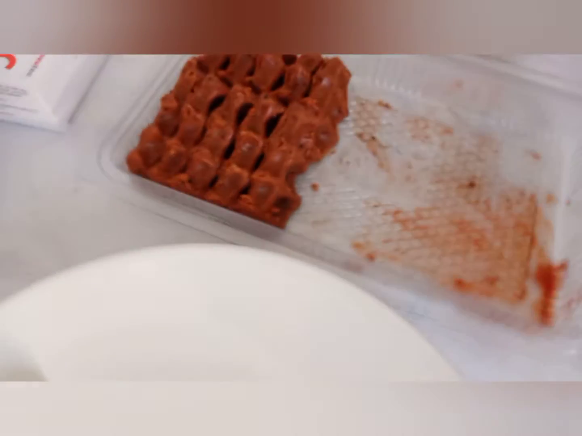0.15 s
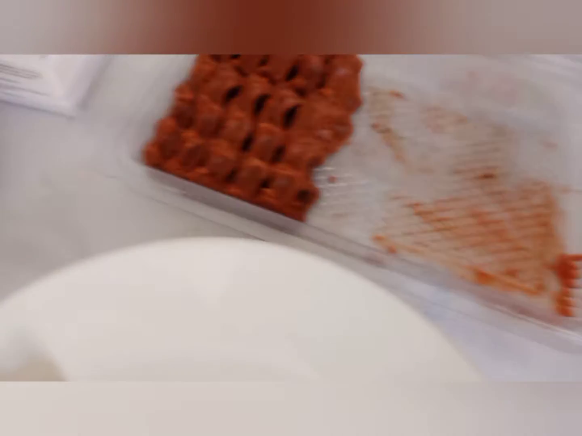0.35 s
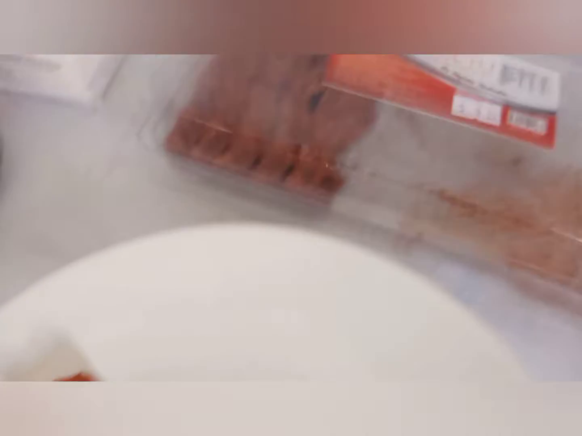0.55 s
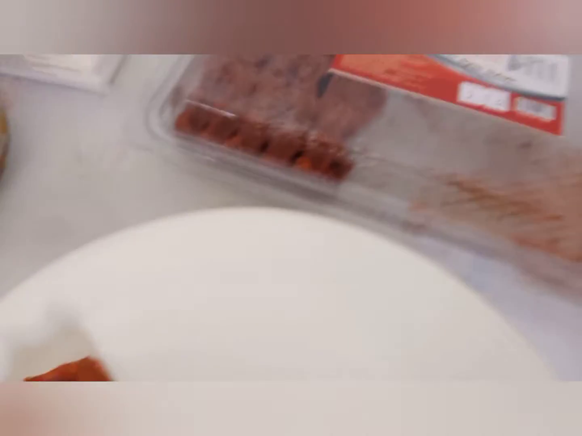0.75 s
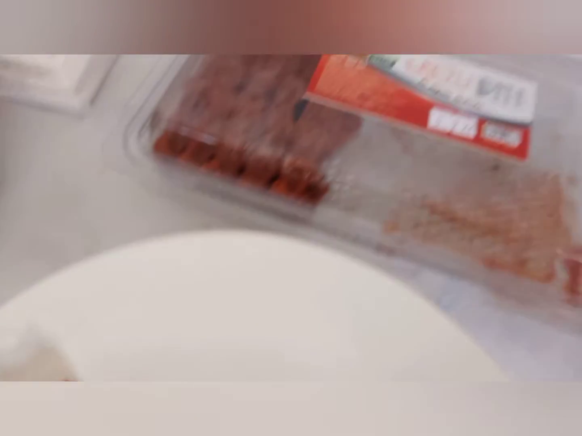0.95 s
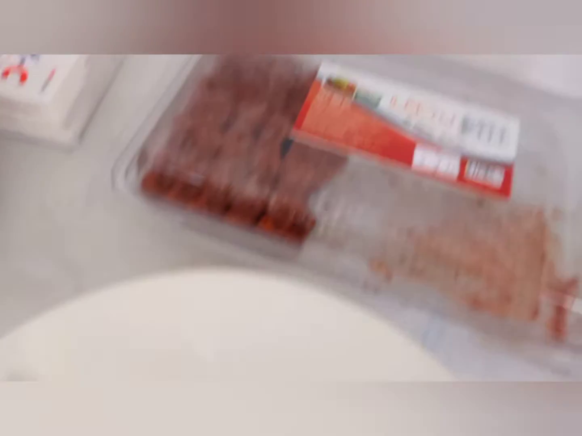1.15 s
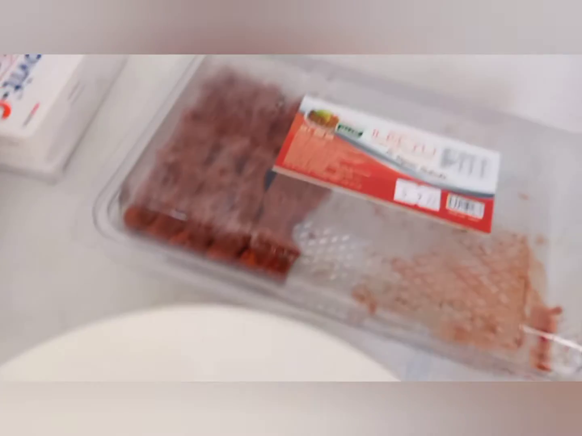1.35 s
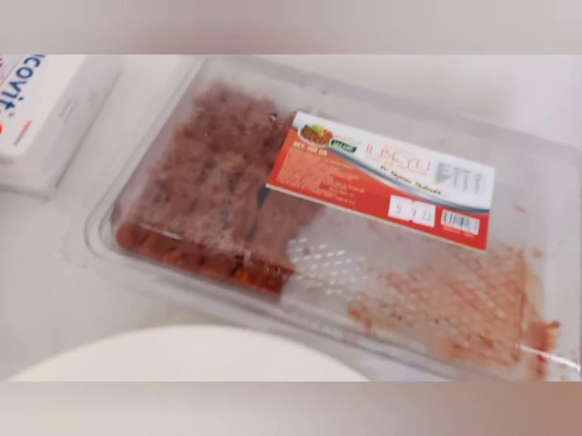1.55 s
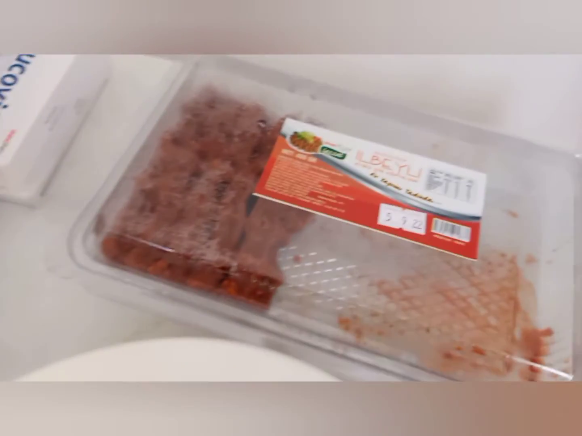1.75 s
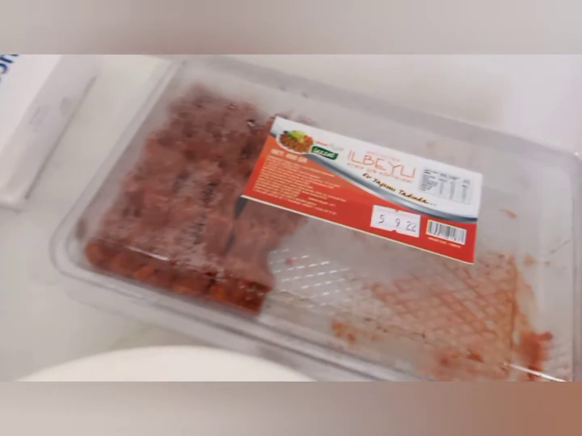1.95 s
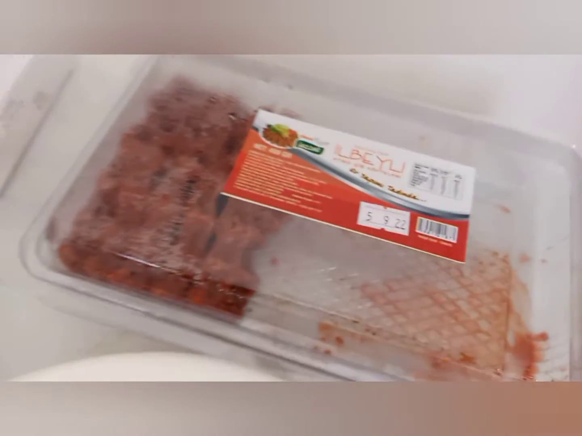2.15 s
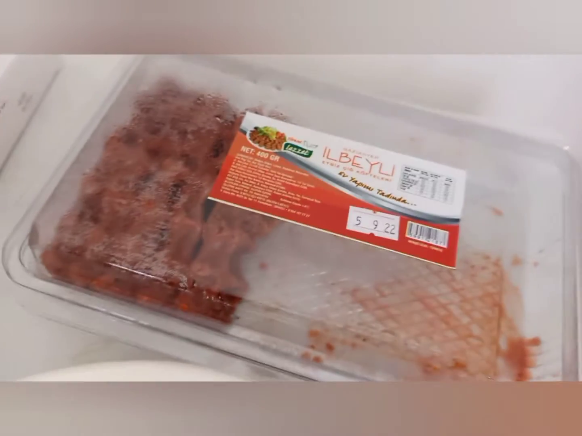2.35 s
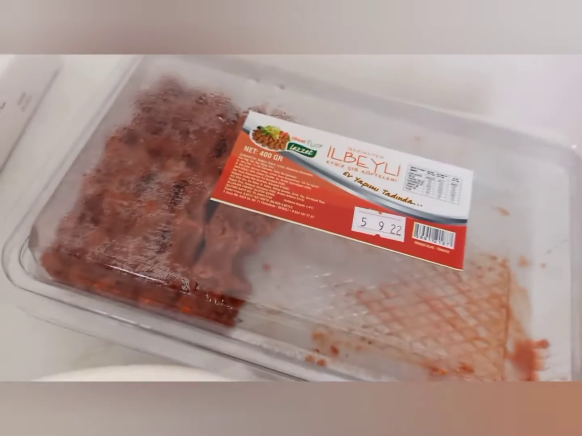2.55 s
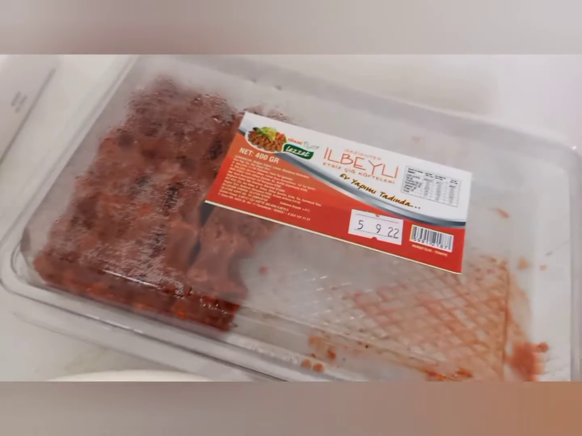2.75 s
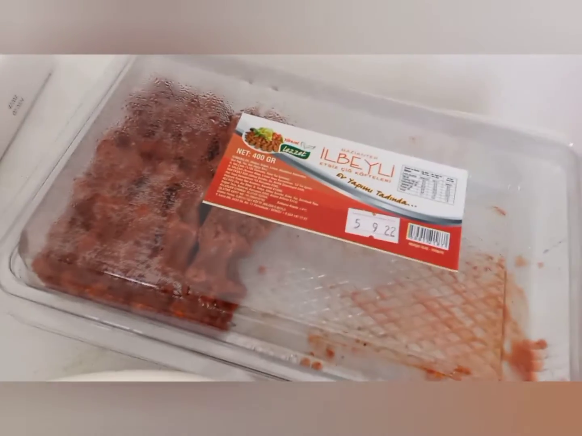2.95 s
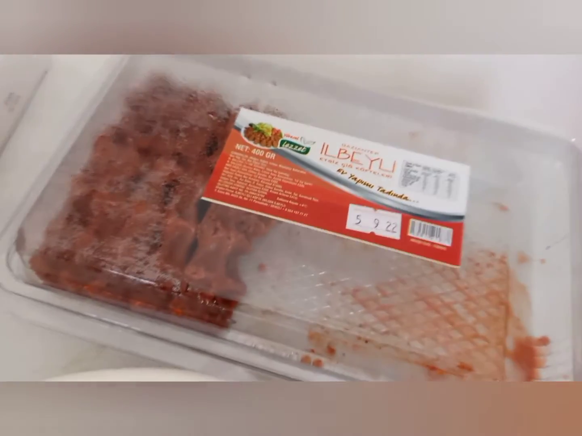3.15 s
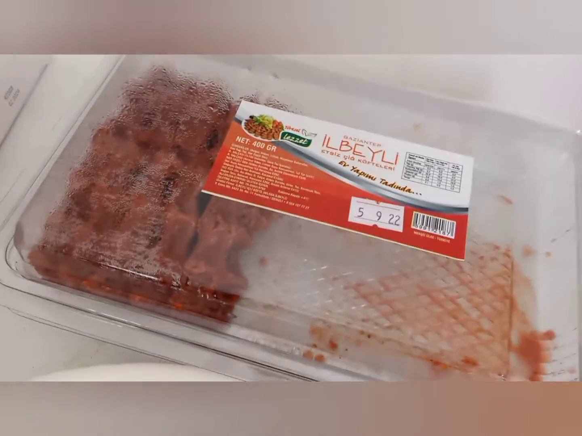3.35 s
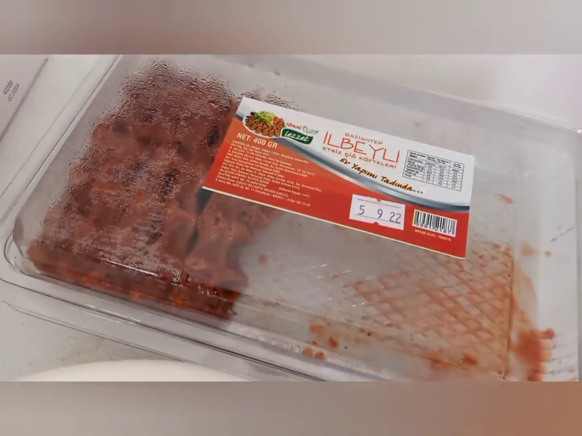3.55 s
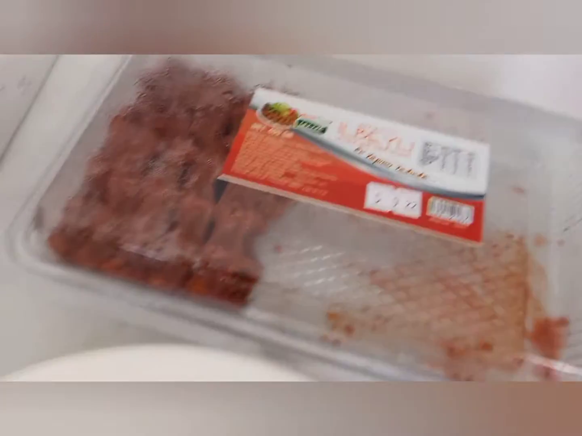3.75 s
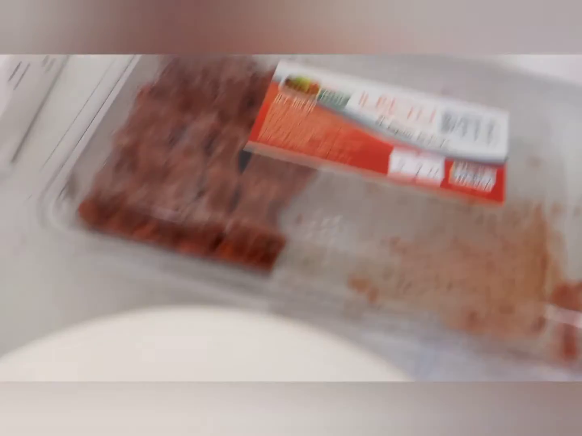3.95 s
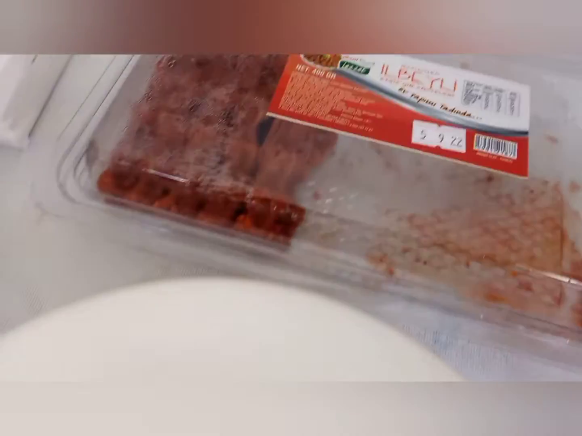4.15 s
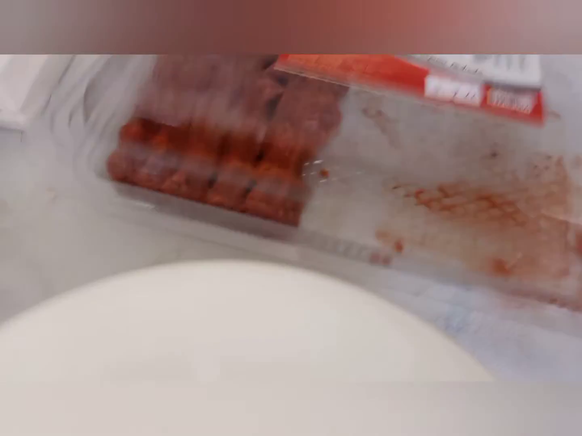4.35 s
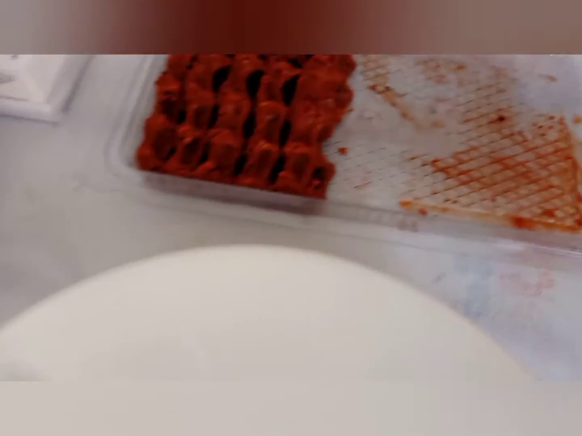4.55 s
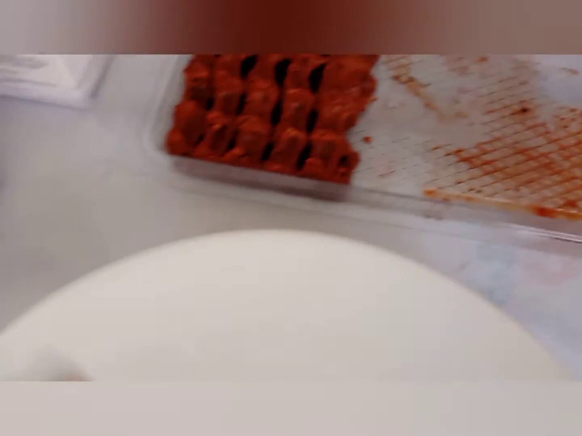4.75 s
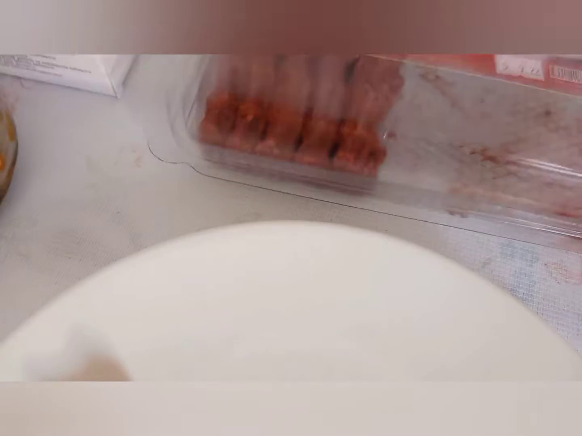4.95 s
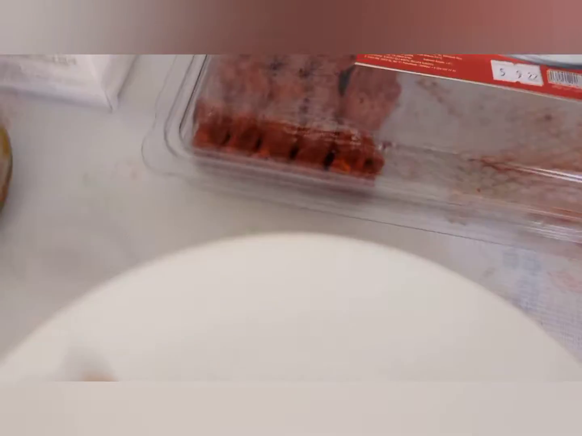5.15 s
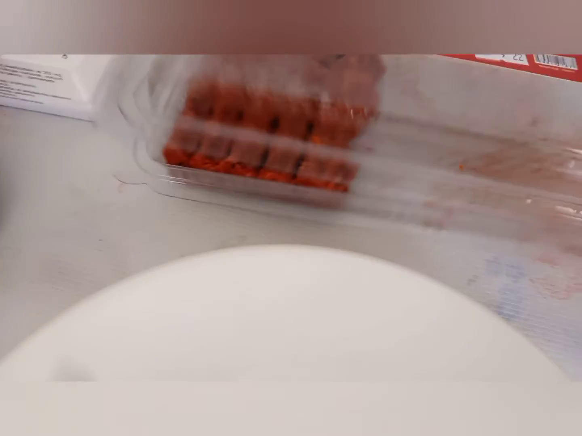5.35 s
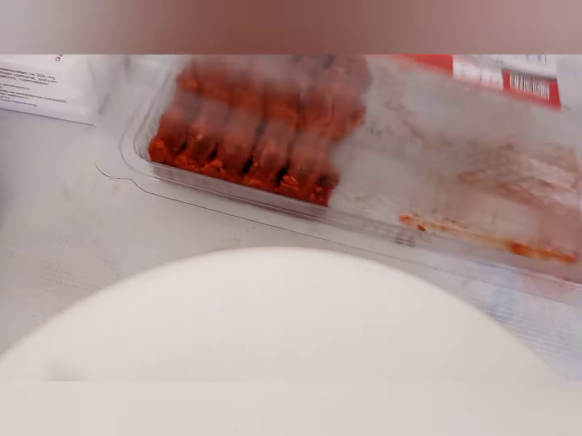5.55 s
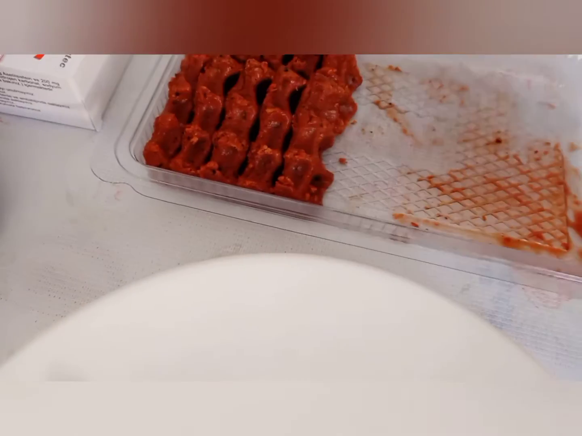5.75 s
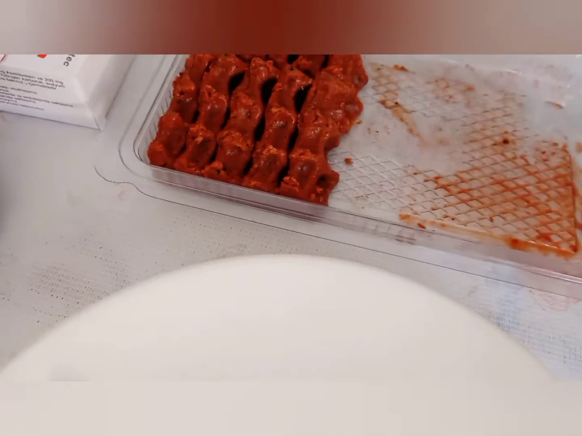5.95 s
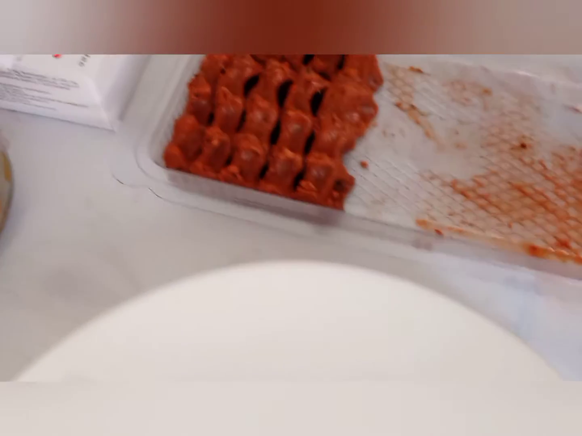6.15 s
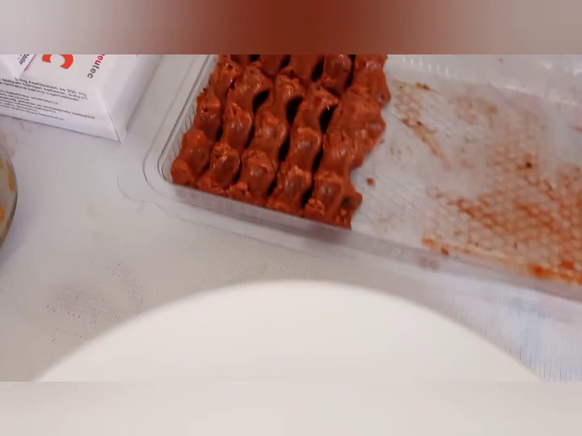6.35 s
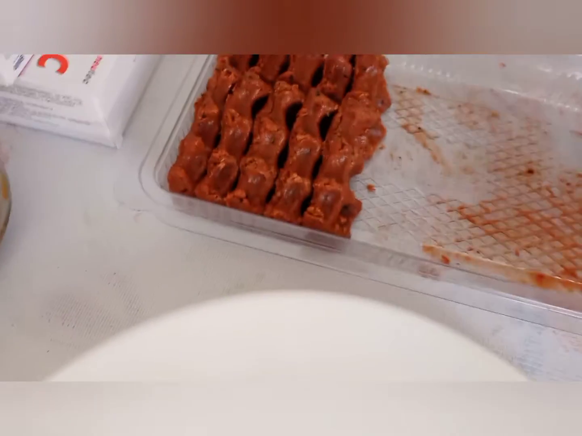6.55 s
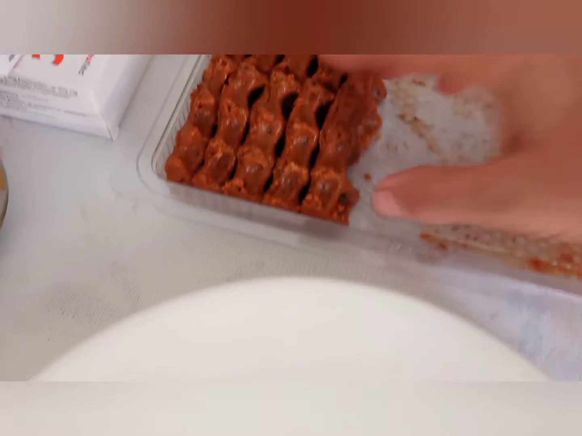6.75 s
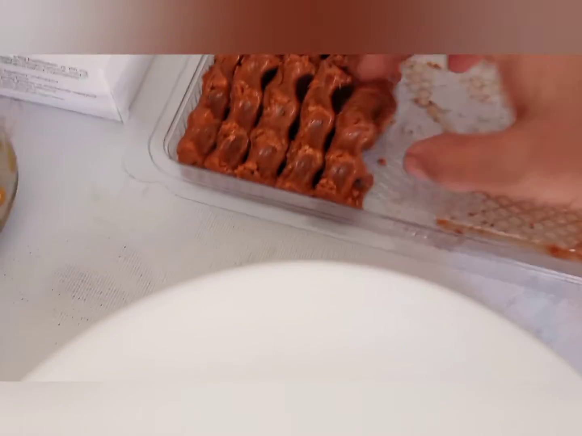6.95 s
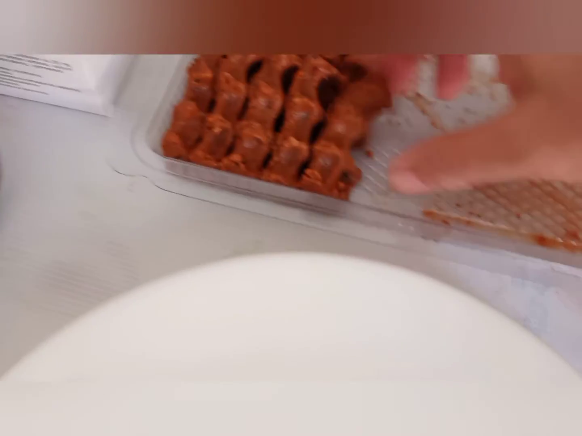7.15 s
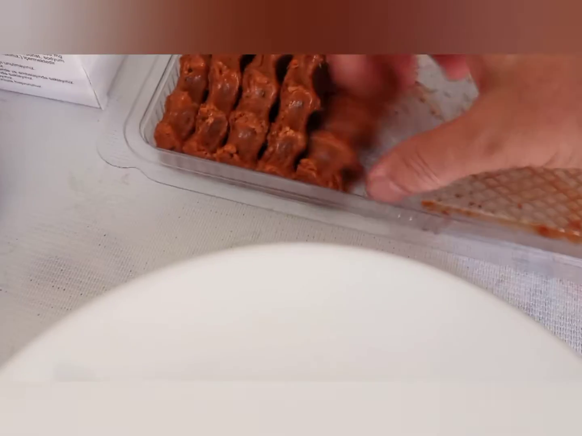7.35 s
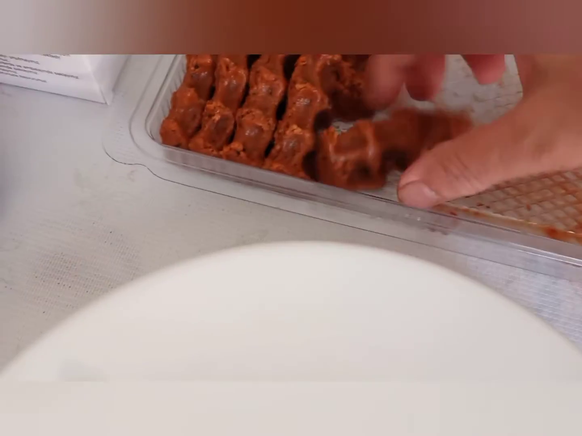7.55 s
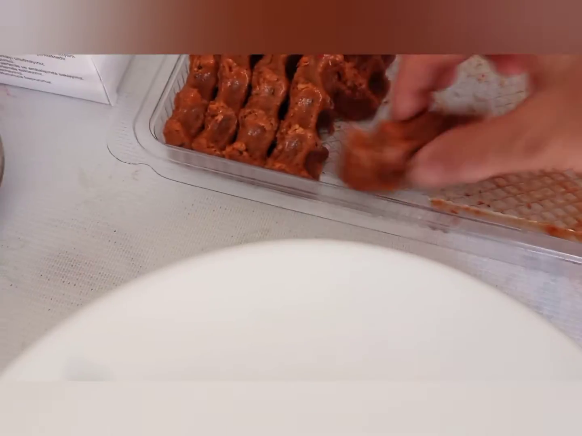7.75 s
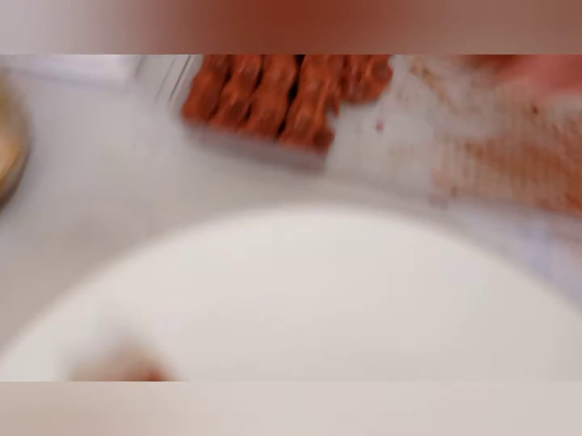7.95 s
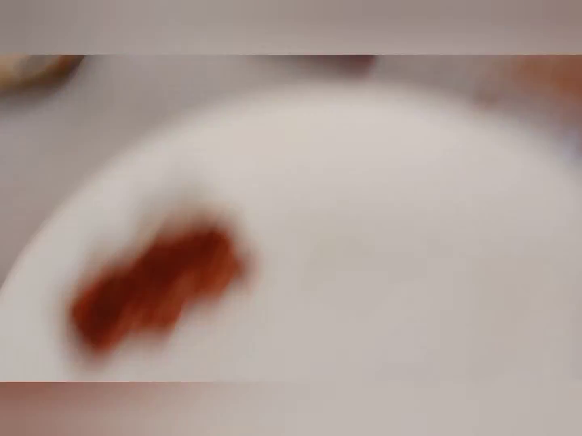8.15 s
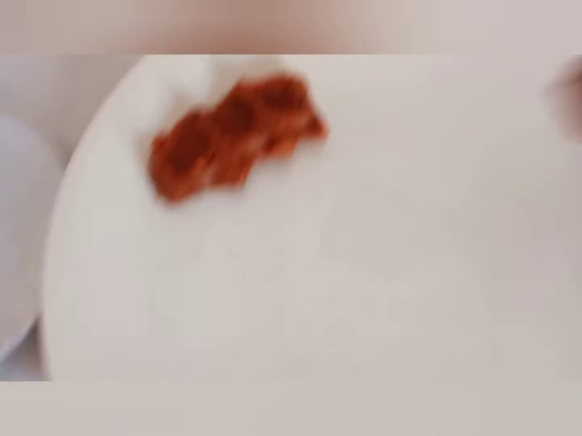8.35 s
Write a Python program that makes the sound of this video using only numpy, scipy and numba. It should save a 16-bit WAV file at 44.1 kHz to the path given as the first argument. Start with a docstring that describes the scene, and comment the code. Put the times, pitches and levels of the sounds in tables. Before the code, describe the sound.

Sharp clicks, short rubs and low flaps come from a plastic food box closed and opened by hand in a quiet room.

```python
"""A thin plastic food tray, its lid shut, opened and flexed by hand on a table, close to a phone microphone.
Creases snap and ring the tray, the rim rubs and rattles, the loose lid wobbles in the bass, food peels off.
The place is a small room that answers briefly. Far outside, a sparrow gives short falling chirps.
Behind it all lie faint whistles, a low household drone and soft air hiss."""
import sys
import numpy as np
from scipy import signal
from scipy.fft import rfft, irfft, next_fast_len
from scipy.io import wavfile
from scipy.ndimage import uniform_filter1d
from numba import njit

SR = 44100
rng = np.random.default_rng(int(sys.argv[2]) if len(sys.argv) > 2 else 0)


def digitize_waveform(pressure):
    """Quantize a signal to 16-bit integers and store it at the path in sys.argv[1].

    Rows of a 2-D input are taken as channels; values are limited to [-1, 1].
    """
    field = np.atleast_2d(pressure).T
    bounded = np.clip(field, -1, 1)
    quanta = np.round(bounded * 32767).astype(np.int16)
    wavfile.write(sys.argv[1], SR, quanta)


N = 370440

SNAP_T60_S, HOLLOW_T60_S, HOLLOW_DB = 0.033, 0.14, -15  # the tray's hollow rings on after a snap
SOFT_DB, HARD_DB = -59, -24  # a snap has no hard tick at the first level, all of it at the second
# creases, close up: t/s, crack peak/dB, crack f/Hz, treble/dB, body/dB (both against the crack)
CREASE_SNAPS = [(0.2866, -24.5, 4700, -2, -46), (0.496, -12.5, 4660, -13, -13.5),
                (0.6499, -28, 1920, -8, -3), (0.6805, -22.5, 2850, -21, -12), (0.7026, -15, 6640, -8, -21),
                (0.7103, -14, 7300, -5, -12), (0.7644, -23.5, 1980, -30, -4),
                (1.886, -37.5, 1810, -30, -36), (2.2086, -38.5, 1820, -3, -36), (4.005, -36, 1760, -5, -26),
                (4.0233, -21.5, 3670, -10, 2), (4.318, -21.5, 1640, -17, -10.5),
                (4.4021, -21.5, 1530, -37, -6), (4.4285, -25, 1620, -4.5, -3.5),
                (4.6578, -36.5, 5700, -19, 0), (4.6877, -27.5, 2100, -5.5, -2),
                (5.0884, -16, 6450, -6.5, -12), (5.1024, -36, 4260, -16, -21),
                (5.1145, -26, 3660, -15.5, -12), (5.13, -21, 6850, -5, -11), (5.16, -32.5, 6850, -6, -8),
                (5.283, -35.5, 6260, 2.5, -33), (5.336, -40, 5000, -11, -12.5),
                (5.5178, -20, 1560, -3.5, -14.5), (5.5496, -19, 1480, -2, -1),
                (5.5814, -22.5, 2060, -3, -4), (5.844, -24, 4970, -9, -34.5), (6.1535, -18, 1550, -10, -9),
                (6.1744, -19.5, 5250, -15, -13.5), (6.2353, -18.5, 1560, -8.5, -3.5),
                (6.2472, -11.5, 3400, -20, -6.5), (6.2911, -29, 3500, -21, 5.5),
                (6.3144, -29.5, 3260, -16, 4.5), (6.354, -37, 1680, -20, 9), (6.4196, -22, 3570, -27, -13),
                (6.4683, -28, 1750, -21, -11), (6.534, -40, 1560, -37, -31), (6.5682, -42, 1770, -35, 5),
                (7.1838, -35, 1630, -41, -17), (7.7288, -40, 1700, -36, -6)]
def snaps():
    """A crease flips: one hard tick, then a dying burst of slips; the treble dies first, the hollow last."""
    out, t = np.zeros(N), np.arange(SR // 5) / SR
    fade = decay(t, SNAP_T60_S)
    slipping = fade * (1 - np.exp(-t / 0.001884))
    hollow = undb(HOLLOW_DB) * decay(t, HOLLOW_T60_S)
    for s, db, hz, treble_db, body_db in CREASE_SNAPS:
        noise = rng.standard_normal(len(t))
        hardness = np.clip((db - SOFT_DB) / (HARD_DB - SOFT_DB), 0, 1)
        tick = 1.33 * hardness * np.exp(-t / 0.00075)
        crack, treble, body = tray(noise * (slipping + tick), hz, spread=0.35, lasting=noise * hollow)
        treble = peak(treble * fade ** 0.5, db + treble_db)
        add(out, s, peak(crack, db) + treble + peak(body, db + body_db))
    return out


CRACK_BAND = signal.butter(5, [1100, 7600], "band", fs=SR, output="sos")
BODY_BAND = signal.butter(3, [280, 1000], "band", fs=SR, output="sos")
# modes of the whole tray: f/Hz, width/Hz, gain/dB
BODY_MODES = [(305.2, 67, -5.5), (373.2, 15.5, 0.5), (491.4, 18, 4), (541, 20.2, 2), (603.4, 22, 4),
              (709, 93, 2), (832.4, 40, -10), (1068, 60, -12)]
# modes of the thin sheet: f/Hz, width/Hz, gain/dB
SHEET_MODES = [(1483, 455, 3.5), (1736, 56, 5), (2292, 57, -2), (2909, 43, 0), (3300, 120, -8.5),
               (3880, 1400, -3), (4446, 100, -6), (4990, 280, -14), (5810, 110, -9), (6310, 420, -3),
               (6800, 19, -13), (7195, 250, -1.5)]
# colour of the plastic above the crack band: f/Hz, gain/dB
TREBLE_COLOUR = [(7000, -5.5), (8500, 4.5), (11000, 3), (13000, -8), (15000, 4.5), (16000, -2)]
def tray(drive, hz, spread, lasting=0):
    """The plastic answers a drive with crack, treble and body; lasting stirs only the body."""
    share = rng.standard_normal(len(BODY_MODES) + len(SHEET_MODES))
    body_share, sheet_share = np.split(share, [len(BODY_MODES)])
    width = 1.1 * spread * hz
    pitched = svf(svf(drive, 1. * hz, width), 1. * hz, width)
    wide = svf(svf(drive, 1.4 * hz, 4.3 * hz), 1.6 * hz, 5.6 * hz)
    # bending the sheet detunes its modes; those near the pitch of the crack answer most
    bent = np.array(SHEET_MODES) * [1 + 0.019 * share[-1], 1, 1]
    near = undb(-8 * np.abs(np.log2(bent[:, 0] / hz)))
    sheet = ring(drive, bent, near * np.tanh(sheet_share))
    crack = signal.sosfilt(CRACK_BAND, level(pitched, -7.5) + level(wide, -5) + level(sheet, 0))
    body = ring(drive + lasting, BODY_MODES, np.sign(body_share) + .5 * body_share)
    return crack, colour(drive, TREBLE_COLOUR), signal.sosfilt(BODY_BAND, body)


RUB_T60_S = 0.11
# strokes on the rim: t/s, swell/s, hold/s, level/dB, f/Hz, treble/dB, body/dB (both against the level)
RIM_RUBS = [(0.226, .02, .037, -58.5, 4870, -5.5, -24), (0.27, 0.041, 0.012, -42, 4000, -7.5, -17),
            (0.473, 0.022, 0.0059, -36, 4300, -0.5, -5.5), (3.995, 0.018, 0.0086, -48.5, 2600, -2, -15),
            (4.162, 0.0099, 0.02, -65, 6400, -13.5, -8), (4.218, 0.021, 0.077, -35.5, 6600, -11.5, -13.5),
            (4.509, 0.056, .025, -58.5, 4530, -8, -32), (5.252, .023, 0.053, -54.5, 4740, -6, -4),
            (5.462, 0.037, 0.019, -33, 6000, -12, -10), (5.646, 0.032, .02, -57, 5500, 1.5, -40),
            (6.113, .014, 0.007, -49.5, 5230, -2, -17), (5.732, 0.051, 0.049, -63, 4570, -22, -22),
            (7.377, 0.048, 0.11, -67, 2370, -19, -6.5)]
def rubs():
    """Rim and fingers rub with a slow swell."""
    out = np.zeros(N)
    for s, swell, hold, db, hz, treble_db, body_db in RIM_RUBS:
        add(out, s, slips(swell, hold, RUB_T60_S, db, hz, treble_db, body_db))
    return out


RATTLE_SWELL_S, RATTLE_HOLD_S = 0.0034, 0.013
FIRM_DB, FIRM_HZ, FIRM_TREBLE_DB = -43.5, 2900, -16  # level, pitch and relative treble of a firm knock
OCTAVES_PER_DB, TREBLE_DB_PER_DB = 0.041, 1.5
# rattles after a knock: t/s, t60/s, level/dB, body/dB (against the level)
KNOCK_RATTLES = [(.448, 0.13, -55, -1), (.495, 0.23, -56, 16), (.704, 0.21, -37, 10.5),
                 (.759, 0.055, -35, -1), (1.853, 0.3, -55.5, -7), (2.204, 0.39, -46.5, -2.5),
                 (4.026, 0.26, -63.5, 15), (4.397, 0.16, -44.5, 5.5), (4.683, 0.034, -43.5, -2),
                 (5.091, 0.34, -41.5, -9), (5.541, 0.31, -39.5, 3.5), (5.835, 0.088, -45, -3),
                 (6.15, 0.25, -51, 7), (6.243, 0.48, -41.5, 12.5), (6.3, 0.11, -59, 27),
                 (6.409, 0.049, -40, 9.5), (6.461, 0.25, -48.5, -17), (6.568, 0.38, -59, 6.5),
                 (7.185, 0.18, -51.5, -7), (7.73, 0.085, -51.5, -4)]
def rattles():
    """A knocked tray rattles at once and dies away; a harder knock rings higher and brighter."""
    out = np.zeros(N)
    for s, t60, db, body_db in KNOCK_RATTLES:
        hz = FIRM_HZ * 2 ** (OCTAVES_PER_DB * (db - FIRM_DB))
        treble_db = FIRM_TREBLE_DB + TREBLE_DB_PER_DB * (db - FIRM_DB)
        add(out, s, slips(RATTLE_SWELL_S, RATTLE_HOLD_S, t60, db, hz, treble_db, body_db))
    return out


def slips(swell, hold, t60, db, hz, treble_db, body_db):
    """Dense uneven slips through the tray that swell, hold and fade; the treble fades first."""
    t = np.arange(SR // 2) / SR
    drive = rng.standard_normal(len(t)) * undb(0.83 * rng.exponential(size=len(t)))
    crack, treble, body = tray(drive, hz, spread=1.0)
    swell_db = -30 * np.clip(1 - t / swell, 0, 1)
    fade_db = -60 * np.clip(t - swell - hold, 0, None) / t60
    treble = level(treble, db + treble_db) * undb(0.71 * fade_db)
    return undb(swell_db + fade_db) * (level(crack, db) + treble + level(body, db + body_db))


FLAP_T60_S = .18
# swings of the lid, close to the microphone: t/s, peak/dB, f/Hz
LID_FLAPS = [(0.455, -39, 141), (.499, -38, 193), (0.648, -36, 118), (0.714, -29, 138), (0.738, -26, 202),
             (0.78, -32.5, 103.7), (2.356, -50.5, 145), (4.069, -47, 205), (4.305, -41, 205),
             (4.41, -39.5, 190), (4.44, -33.5, 158.6), (4.496, -43, 126), (4.726, -36.5, 129.7),
             (4.801, -39.5, 141), (5.098, -36, 265), (5.124, -36, 219.3), (5.187, -44.5, 130),
             (5.262, -45.5, 207), (5.543, -25.5, 288.6), (5.567, -27, 130), (5.606, -31, 132.3),
             (5.88, -31.5, 123), (6.156, -32, 165), (6.189, -34, 116), (6.251, -24, 181),
             (6.278, -31.5, 151), (6.31, -19, 133), (6.37, -28, 150.4), (6.407, -32, 166),
             (6.439, -30, 125.4), (6.499, -37.5, 140.5), (6.53, -40, 222), (6.589, -37.5, 189),
             (6.66, -45, 149.4), (6.793, -44, 216), (8.277, -47, 205.5), (8.35, -46, 259)]
def flaps():
    """The loose lid swings once and settles in a slow mode; weaker neighbours beat above and below."""
    out, t = np.zeros(N), np.arange(SR // 2) / SR
    envelope = (1 - np.exp(-t / 0.0038)) ** 2 * decay(t, FLAP_T60_S)
    for s, db, hz in LID_FLAPS:
        turn, detune = rng.random(2)
        mode = np.sin(2 * np.pi * (hz * t + turn))
        above = .45 * np.sin(2 * np.pi * hz * (1.25 + .5 * detune) * t)
        below = 0.35 * np.sin(2 * np.pi * hz * (0.44 + 0.3 * turn) * t)
        add(out, s, peak((mode + above + below) * envelope, db))
    return out


PEEL_TICKS_PER_S, PEEL_HZ, PEEL_T60_S = 90, 11400, 0.024
# food coming unstuck: t/s, length/s, level/dB (before the band-pass)
FOOD_PEELS = [(7.045, .11, -63), (7.382, .14, -69)]
def peels():
    """Sticky food peels off the tray in sparse, tiny treble ticks."""
    out, t = np.zeros(N), np.arange(SR // 40) / SR
    tick = decay(t, PEEL_T60_S)
    for s, length, db in FOOD_PEELS:
        size = int(length * SR)
        onsets = rng.random(size) < PEEL_TICKS_PER_S / SR
        strength = undb(2.6 * rng.standard_normal(size))
        add(out, s, undb(db) * np.convolve(onsets * strength, tick))
    return svf(out * rng.standard_normal(N), 1. * PEEL_HZ, 3000.)


def room(x, t60, db, top_hz):
    """The walls return a diffuse tail with dulled treble."""
    t = np.arange(SR // 2) / SR
    tail = rng.standard_normal(len(t)) * decay(t, t60) * np.minimum(t / 0.013, 1)
    tail = signal.lfilter(*signal.butter(1, top_hz, fs=SR), tail)
    return signal.fftconvolve(x, tail * undb(db) / np.sqrt(np.sum(tail ** 2)))[:N]


CHIRP_FROM_HZ, CHIRP_TO_HZ = 5000, 3050
# resonances between bird and table: f/Hz, width/Hz, gain/dB
PATH_MODES = [(3330, 110, -3), (3560, 150, -7), (3900, 80, 1), (4250, 90, -9), (4600, 90, -4),
              (4850, 110, -8), (5700, 250, -3)]
# chirps, far outside: t/s, length/s, level/dB (before those resonances)
SPARROW_CHIRPS = [(0.046, .12, -63), (1.055, .11, -62.5), (3.462, 0.047, -63), (3.801, 0.084, -60.5),
                  (6.743, .08, -59), (8.226, 0.066, -57.5)]
def sparrow():
    """Short falling chirps, broken into patches by the resonances on their way indoors."""
    out = np.zeros(N)
    for s, length, db in SPARROW_CHIRPS:
        progress = np.arange(int(length * SR)) / (length * SR)
        hz = CHIRP_FROM_HZ + (CHIRP_TO_HZ - CHIRP_FROM_HZ) * progress
        envelope = undb(db) * np.sin(np.pi * progress) ** .5
        add(out, s, envelope * np.sin(2 * np.pi * np.cumsum(hz) / SR))
    indoors = ring(out * undb(6 * walk(120)), PATH_MODES)
    return indoors + room(indoors, t60=.3, db=5, top_hz=9000)


# thin whistles in the background: t/s, length/s, f/Hz, level/dB (at mid-swell)
FAINT_WHISTLES = [(1.18, 0.077, 6270, -68), (4.78, 0.097, 4930, -71), (7.24, 0.31, 6200, -73),
                  (7.967, 0.23, 6050, -66)]
def whistles():
    """Faint rough tones come and go: narrow bands of noise."""
    out, width_hz = np.zeros(N), 130.
    for s, length, hz, db in FAINT_WHISTLES:
        t = np.arange(int(length * SR)) / SR
        tone = svf(svf(rng.standard_normal(len(t)), 1. * hz, width_hz), 1. * hz, width_hz)
        add(out, s, level(tone, db) * np.sin(np.pi * t / length))
    return out


# low resonances of the house: f/Hz, width/Hz, gain/dB
DRONE_MODES = [(57, 16, -0.5), (150, 34, -6), (205.3, 14, -2), (305, 16, -3.5), (401.9, 8.8, -2),
               (428, 4, -13)]
def drone():
    """A household drone: noise rings low resonances, each wavering in level."""
    hum = sum(undb(2.5 * walk(7.4)) * ring(rng.standard_normal(N), [mode]) for mode in DRONE_MODES)
    return signal.sosfilt(signal.butter(3, [45, 520], "band", fs=SR, output="sos"), hum)


# room tone at the microphone: f/Hz, gain/dB
AIR_COLOUR = [(280, -32.5), (480, 0.5), (675, -16), (1050, -11.5), (1620, -12.5), (1790, -14),
              (2240, -11.5), (3440, -12.5), (4290, -12), (7100, -14), (8230, -24.5), (13600, -32.5),
              (15100, -22), (16500, -31)]
def air():
    """Soft air hiss in which narrow bands swell now and then."""
    bands = [(hz, 70, 0) for hz in 800 * 1.1 ** np.arange(23)]
    flicker = sum(undb(6 * walk(9)) * ring(rng.standard_normal(N), [band]) for band in bands)
    return colour(rng.standard_normal(N) + 1.2 * flicker, AIR_COLOUR) * undb(0.658 * walk(2.2))


def undb(db):
    return 10 ** (np.asarray(db) / 20)


def level(x, db):
    return x * undb(db) / np.sqrt(np.mean(x ** 2))


def peak(x, db):
    return x * undb(db) / np.max(np.abs(x))


def decay(t, t60):
    return np.exp(-np.log(1000) * t / t60)


def add(out, s, sound):
    i = int(s * SR)
    out[i:i + len(sound)] += sound[:len(out) - i]


@njit
def svf(x, hz, width):
    """State-variable band-pass, gain 1 at the centre."""
    y, band, low = np.empty(len(x)), 0., 0.
    g, damping = np.tan(np.pi * hz / SR), width / hz
    for i in range(len(x)):
        v = (band + g * (x[i] - low)) / (1 + g * (g + damping))
        band, low, y[i] = 2 * v - band, low + 2 * g * v, damping * v
    return y


def ring(x, modes, share=1.):
    """Sum of resonances (f/Hz, width/Hz, gain/dB); share is how much each one is excited."""
    share = share * np.ones(len(modes))
    return sum(g * undb(db) * svf(x, 1. * hz, 1. * w) for g, (hz, w, db) in zip(share, modes))


def colour(x, spectrum):
    """Shape by (f/Hz, gain/dB) points, silent outside them."""
    hz, db = np.transpose(spectrum)
    size = next_fast_len(len(x) + 512)
    log_hz = np.log(np.arange(size // 2 + 1) * SR / size + 1)
    gain = undb(np.interp(log_hz, np.log(hz), db, -90, -90))
    return irfft(rfft(x, size) * gain, size)[:len(x)]


def walk(rate):
    """Random levels held 1 / rate s and slewed twice; spread near 1."""
    hold = int(SR / rate)
    steps = np.repeat(rng.standard_normal(N // hold + 1), hold)
    return 0.89 * uniform_filter1d(uniform_filter1d(steps, hold), hold)[:N]


def scene():
    """Mono, from the table: the tray close up, the small room around it, the sparrow far off."""
    creases = snaps()
    grip = undb(0.47 * walk(90) + 1.6 * walk(350))  # rubs and rattles flutter about their listed levels
    close = creases + grip * (rubs() + rattles()) + flaps() + peels()
    walls = room(close, t60=0.15, db=-17.5, top_hz=6000)
    return (close + walls + sparrow() + whistles() + level(drone(), db=-61.5) + level(air(), db=-68))[None]


def record(dry):
    """The phone cuts the top above 16 kHz."""
    return signal.sosfilt(signal.ellip(8, .2, 70, 16000, fs=SR, output="sos"), dry)


dry = scene()
out = record(dry)
digitize_waveform(out)
```